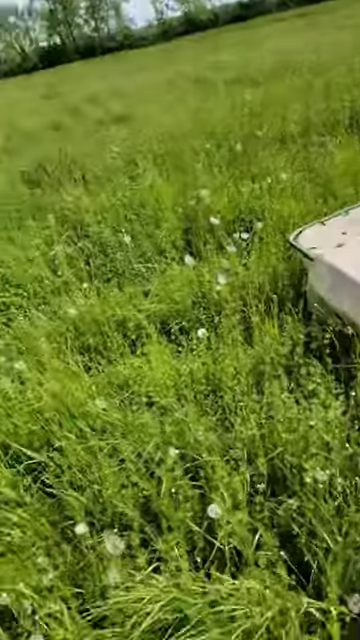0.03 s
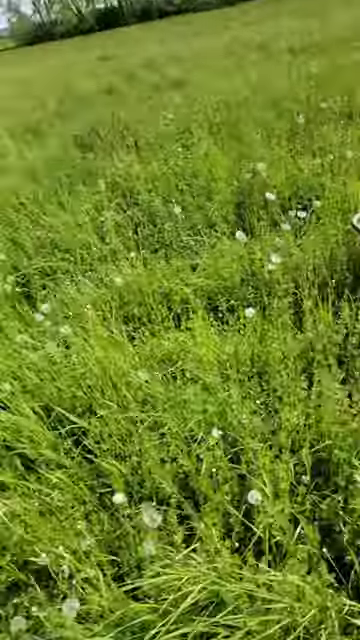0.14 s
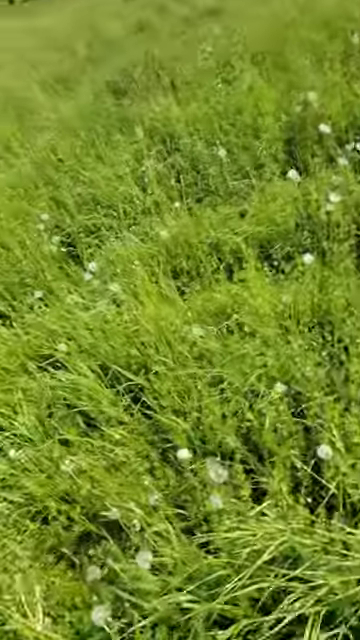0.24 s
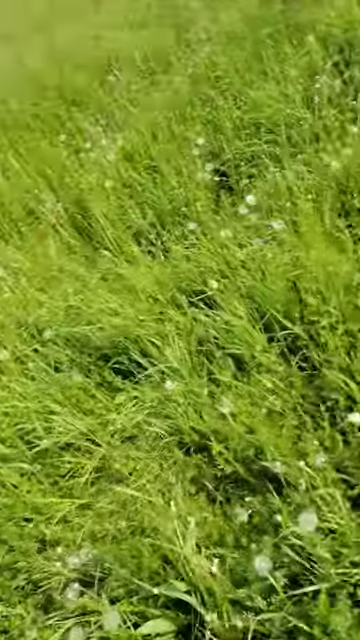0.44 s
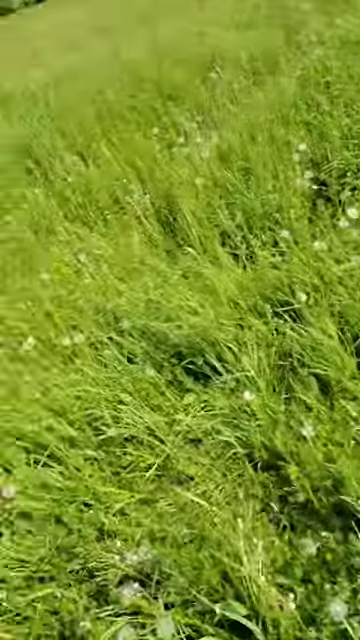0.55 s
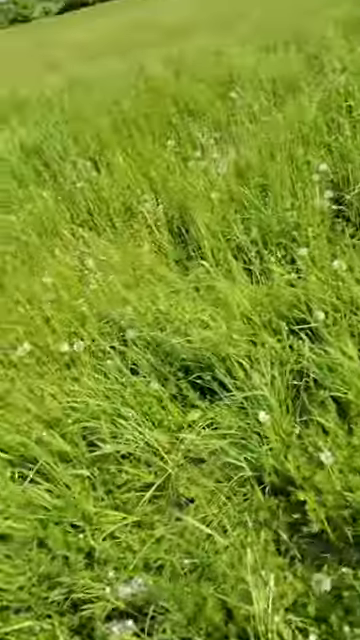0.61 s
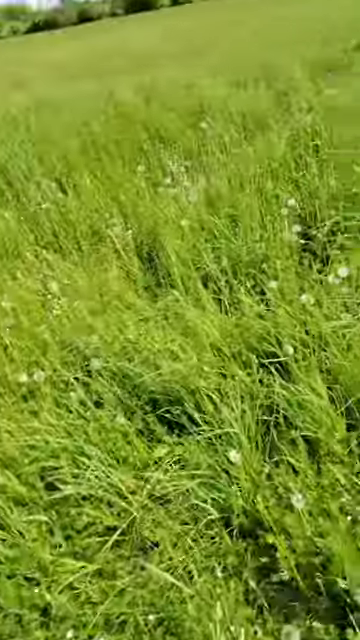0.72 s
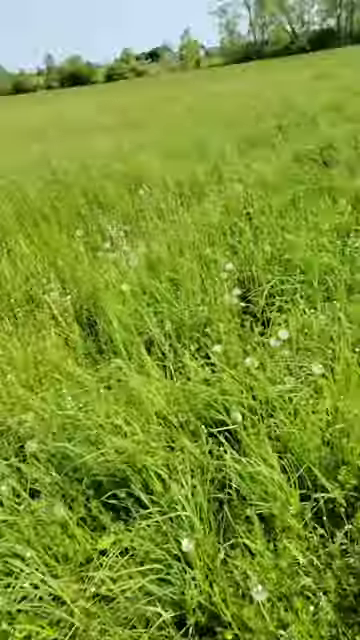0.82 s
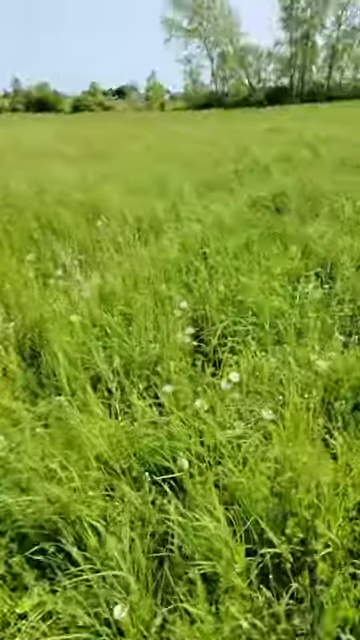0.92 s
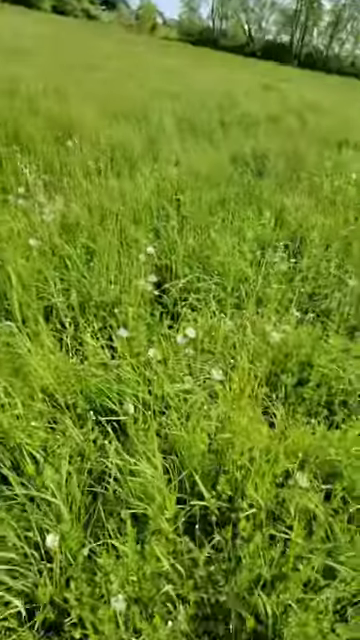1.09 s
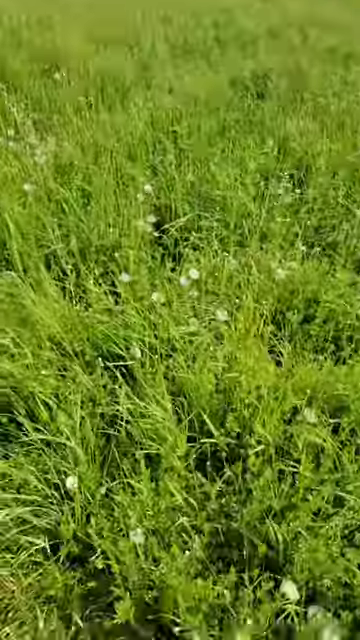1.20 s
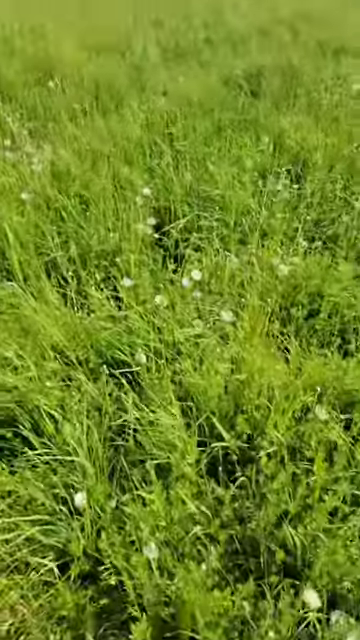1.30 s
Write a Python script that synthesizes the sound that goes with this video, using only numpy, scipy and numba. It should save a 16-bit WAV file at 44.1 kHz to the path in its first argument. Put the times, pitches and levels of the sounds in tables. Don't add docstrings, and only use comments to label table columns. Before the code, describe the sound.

A fawn bleats once, close and loud, in an open field. A tiny creak at 0.12 s jumps quickly upward into a bright, nasal cry, loudest near 0.27 s, rough and buzzing until about 0.53 s, then softer, cleaner and dropping in pitch to stop by 0.68 s. Throughout, a more distant diesel idles with low rumble, light knocking, faint whine and hiss, left alone until the end.

```python
import sys
import numpy as np
from scipy import signal
from scipy.fft import rfft, irfft
from scipy.io import wavfile
from scipy.ndimage import uniform_filter1d, minimum_filter1d
from numba import njit

SR = 44100
rng = np.random.default_rng(int(sys.argv[2]) if len(sys.argv) > 2 else 0)


def int16_out(signal):
    q = np.round(np.clip(np.atleast_2d(signal).T, -1, 1) * 32767)
    wavfile.write(sys.argv[1], SR, q.astype(np.int16))


def to_linear_factor(level_db):
    exponent = np.asarray(level_db, float) / 20
    return 10 ** exponent


N = 59535


def table(rows, t, first=1):
    rows = np.array(rows, float)
    return [np.interp(t, rows[:, 0], c) for c in rows.T[first:]]


def level(x, db):
    return x * to_linear_factor(db) / np.sqrt(np.mean(x ** 2))


@njit
def svf(x, hz, width):
    y, b, l = np.empty(len(x)), 0., 0.
    for i in range(len(x)):
        g, k = np.tan(np.pi * hz[i] / SR), width / hz[i]
        v = (b + g * (x[i] - l)) / (1 + g * (g + k))
        b, l, y[i] = 2 * v - b, l + 2 * g * v, k * v
    return y


def walk(rate):
    k = int(SR / rate)
    steps = np.repeat(rng.standard_normal(N // k + 1), k)
    w = uniform_filter1d(uniform_filter1d(steps, k), k)[:N]
    return w / w.std()


def coloured(shape):
    f, out = np.fft.rfftfreq(N, 1 / SR) + 1, 0
    gain = to_linear_factor(table([(np.log(a), b) for a, b in shape], np.log(f))[0])
    for centre in np.arange(4.5, 15, .5):
        band = np.clip(1 - 2 * abs(np.log2(f) - centre), 0, 1) ** .5
        noise = irfft(rfft(rng.standard_normal(N)) * gain * band, N)
        flicker_db = 0.5 * walk(12.09)
        out = out + to_linear_factor(flicker_db) * noise
    return out


# multiple of the firing rate, level/dB
EXHAUST_PARTIALS = [(.75, -84), (1, -52.5), (1.25, -62), (1.5, -71.5), (1.75, -65), (2, -50), (2.25, -76),
                    (3, -57), (4, -65), (5, -64.5)]


def exhaust(turns):
    out = 0
    for k, db in EXHAUST_PARTIALS:
        strength = 1.44 * to_linear_factor(db + 2.1 * walk(12))
        phase = 2 * np.pi * (k * turns + rng.random()) + 0.23 * walk(10.9)
        out = out + strength * np.sin(phase)
    return out


# f/Hz, level/dB
WHINE_TONES = [(474.6, -47), (546, -64.5), (728, -77.5), (800, -61.5), (898, -56.5), (955, -80), (990, -77),
               (1286, -58.5)]


def whines(t):
    out = 0
    for f, db in WHINE_TONES:
        strength = 1.25 * to_linear_factor(db + 1.06 * walk(20.3))
        phase = 2 * np.pi * (f * t + rng.random()) + 0.37 * walk(14.8)
        out = out + strength * np.sin(phase)
    return out


# place in cycle 0-1, f/Hz, 60 dB decay time/s, level/dB
KNOCK_MODES = [(0, 1300, 0.035, -37), (0.3, 810, 0.044, -45.5), (0.6, 1900, 0.013, -39),
               (0.3, 900, 0.013, -53), (0, 850, .03, -49)]


def knocks(turns, firing_hz):
    out = 0
    for place, f, ring_s, db in KNOCK_MODES:
        beat = turns / 4 - place
        age = beat % 1 * 4 / firing_hz
        luck = rng.standard_normal((40, 2))[np.floor(beat).astype(int) + 2].T
        strength = to_linear_factor(db + 2.3 * luck[0] - 60 * age / ring_s)
        rise = np.clip(age / 0.0032, 0, 1)
        out = out + strength * np.sin(2 * np.pi * f * (1 + 0.04 * luck[1]) * age) * rise
    return out


def injector(turns):
    burst = rng.standard_normal(N) * np.exp(-(turns % 1) / 0.26)
    return level(svf(burst, np.full(N, 5240.), 110.), -70)


# f/Hz, level/dB per Hz
AIR_SPECTRUM = [(18, -36), (30, -1), (98, -9), (312, -15), (473, -8.5), (527, -12), (891, -8),
                (1110, -11.5), (5600, -27.5), (7280, -65), (12300, -120)]
# f/Hz, level/dB per Hz
HISS_SPECTRUM = [(5000, -35), (5800, 0), (7600, 7), (8700, -22), (11000, -0.5), (15700, -1.5), (20000, -9)]
# t/s, level/dB
PHONE_TURN = [
    (0, -5.5),
    (.15, -0.5),
    (.6, -1),
    (1.35, -1),
]


def clatter(t, turns):
    puff_db = 4 * np.cos(2 * np.pi * (turns - .1)) / 2
    puff = to_linear_factor(puff_db + table(PHONE_TURN, t)[0])
    air = coloured(list(AIR_SPECTRUM) + [(5900, AIR_SPECTRUM[-1][1] - 25)])
    return level(air * puff, -47) + level(coloured(HISS_SPECTRUM) * puff, -65.5)


def engine(t):
    firing_hz, first_tick_s = 45.56, .0439
    turns = firing_hz * (t - first_tick_s)
    tones = exhaust(turns) + whines(t)
    return tones + knocks(turns, firing_hz) + injector(turns) + clatter(t, turns)


# t/s, f/Hz
FOLD_PITCH = [
    (.155, 406.7),
    (.181, 422.6),
    (.216, 533),
    (.268, 632.6),
    (.4, 623),
    (.51, 618.2),
    (.622, 577.4),
    (.654, 507),
    (.685, 435),
]


def fold_pitch(t):
    hz = table([(.118, 129.35)] + list(FOLD_PITCH), t)[0]
    hz = uniform_filter1d(hz, size=661) * (1 + .001 * walk(130))
    return hz, np.cumsum(hz) / SR


# t/s, strong-weak alternation/dB, scatter/dB, timing scatter/us, breath level/dB
FOLD_ROUGHNESS = [(.12, 0, 2, 30, -20), (.2, 0, .5, 5, -26), (.25, .5, .8, 7, -24),
                  (.262, 2.5, 1.5, 14, -20), (.272, 2.5, .4, 3, -34), (.31, 2.5, .5, 4, -32),
                  (.325, 1, .9, 9, -23), (.525, 1.2, .9, 9, -24), (.54, 0, .3, 4, -31),
                  (.62, 0, .3, 5, -29), (.68, 0, .5, 8, -24)]
# t/s, dip level/dB
SKIPPED_BEATS = [(0.3123, -1.5), (0.3172, -2.0), (0.3267, -8.4), (0.3363, -8.2), (0.3441, -2.0),
                 (0.3522, -7.5), (0.3619, -9.4), (0.3716, -5.8), (0.3814, -4.8), (0.3922, -5.1),
                 (0.4006, -4.8), (0.41, -1.6), (0.4166, -2.6), (0.4241, -4.9), (0.4319, -2.0),
                 (0.4393, -3.9), (0.4488, -7.0), (0.4584, -7.0), (0.4678, -4.5), (0.4748, -6.7),
                 (0.4837, -2.0), (0.4877, -5.8), (0.497, -6.5), (0.5038, -7.5), (0.5101, -7.8),
                 (0.5164, -4.0), (0.5262, -4.3)]


def fold_source(t, hz, turns):
    cycle = np.round(turns).astype(int)
    alternate_db, scatter_db, jitter_us, breath_db = table(FOLD_ROUGHNESS, t)
    skip_lead_s, skip_depth = .001, 2
    skip_db = np.zeros(cycle[-1] + 1)
    for s, db in SKIPPED_BEATS:
        skip_db[cycle[int((s - skip_lead_s) * SR)]] = skip_depth * db
    luck = rng.standard_normal((2000, 2))[cycle].T
    strong_weak = (cycle % 2 - .5) * 2
    size_db = skip_db[cycle] + alternate_db * strong_weak + scatter_db * luck[0]
    snap = turns + uniform_filter1d(luck[1], size=15) * jitter_us * hz / 10 ** 6
    pulses = 0
    for k in range(1, 80):
        pulses = pulses + np.cos(2 * np.pi * k * snap) * (k * hz < .4 * SR)
    breath = to_linear_factor(breath_db + 14) * rng.standard_normal(N) * (1 + np.cos(2 * np.pi * turns))
    return pulses * to_linear_factor(uniform_filter1d(size_db, size=15)), breath


# t/s, level/dB, mouth f/Hz, throat f/Hz, throat level/dB, brightness/dB
CREAK_SHAPE = [
    (.112, -80, 2080, 3270, -10, 17),
    (.142, -50, 2130, 3300, -23, 19),
    (.162, -29.5, 1560, 3340, -19, -8),
    (.176, -38.5, 1280, 3100, -22, -4),
]
CRY_SHAPE = [
    (0.188, -22.5, 1280, 3150, -14, -10.5),
    (0.204, -14, 1510, 3050, -17, 6.5),
    (0.238, -12, 1890, 3020, -1, 9),
    (0.268, -6.5, 1743, 2726, 0.5, 1),
    (0.431, -13, 1710, 2994, 4, -8),
    (0.549, -20, 1762, 2940, 3, -27.5),
    (.612, -25.5, 1700, 2800, -2.5, -22.5),
    (0.65, -19.5, 1530, 2784, -1, -14),
    (.674, -29, 1550, 2550, 0, -18),
]


def articulation(t):
    release_s = 0.0099
    start, end = CREAK_SHAPE[0], CRY_SHAPE[-1]
    silence = (end[0] + release_s, end[1] - 30) + tuple(end[2:])
    shape = table(list(CREAK_SHAPE) + list(CRY_SHAPE) + [silence], t)
    sounding = (t > start[0]) & (t < end[0] + 1.5 * release_s)
    return [to_linear_factor(shape[0]) * sounding] + shape[1:]


def formant(x, hz, width):
    return svf(svf(x, hz, 0.92 * width), hz, 0.92 * width)


# t/s, f/Hz
NASAL_GLIDE = [
    (.115, 5150),
    (.155, 3620),
    (.185, 3770),
    (.22, 4560),
    (.258, 4960),
    (.272, 4480),
    (.6, 3940),
    (.66, 4800),
]


def tract(t, source, mouth_hz, throat_hz, throat_db, bright_db):
    mouth = formant(source, mouth_hz, 574)
    throat = formant(source * to_linear_factor(throat_db), throat_hz, 758)
    nasal = formant(source * to_linear_factor(bright_db), table(NASAL_GLIDE, t)[0], 580)
    return mouth + throat + to_linear_factor(-5) * nasal


def head_modes(modes, source, airy, opening, bright_db):
    out = 0
    for f, width, db, share in modes:
        patchy_db = 3 * walk(30.3)
        drive = (airy if f > 5000 else source) * opening
        drive = drive * to_linear_factor(db + share * bright_db + patchy_db)
        out = out + formant(drive, f * (1 + 0.033 * walk(23.7)), width)
    return out


FOLD_SWING_DB = [
    -18,
    -5,
]


def fold_swing(turns):
    out = 0
    for k, db in enumerate(FOLD_SWING_DB):
        out = out + to_linear_factor(db) * np.cos(2 * np.pi * (k + 1) * turns)
    return out


# f/Hz, width/Hz, level/dB, share of brightness
NOSE_MODES = [(2450, 400, -8, .2), (5600, 500, -9, 1.2), (6300, 400, -20, .6), (7500, 600, -15, .5),
              (8700, 900, -22, .5)]
# f/Hz, width/Hz, level/dB, share of brightness
TOP_MODES = [(9720, 610, -40.5, 2.2), (12300, 2600, -40, 0.97), (15000, 2500, -44.5, 1.1)]
# f/Hz, width/Hz
NOSE_POCKETS = [(3720, 183), (6550, 120)]


def fawn(t):
    hz, turns = fold_pitch(t)
    pulses, breath = fold_source(t, hz, turns)
    effort, mouth_hz, throat_hz, throat_db, bright_db = articulation(t)
    source = (pulses + breath) * effort
    airy = source + breath * effort * to_linear_factor(9)
    opening = (hz / hz.max()) ** 2
    voice = tract(t, source, mouth_hz, throat_hz, throat_db, bright_db)
    voice = voice + head_modes(NOSE_MODES, source, airy, opening, bright_db)
    for f, width in NOSE_POCKETS:
        voice = voice - svf(voice, np.full(N, float(f)), float(width))
    head_cut = signal.butter(6, 9200, fs=SR, output="sos")
    voice = signal.sosfilt(head_cut, voice) + head_modes(TOP_MODES, source, airy, opening, bright_db)
    return voice + effort * opening ** 2 * fold_swing(turns)


def scene():
    t = np.arange(N) / SR
    return (engine(t) + fawn(t))[None]


@njit
def recover(gain, rate):
    y, g = np.empty(len(gain)), 1.
    for i in range(len(gain)):
        g = min(gain[i], g + (1 - g) * rate)
        y[i] = g
    return y


def roll_off(x):
    return signal.sosfilt(signal.butter(12, 15720, fs=SR, output="sos"), x)


def record(dry):
    limit, release_s = .7, .04
    need = minimum_filter1d(np.minimum(1, limit / (abs(dry[0]) + 1e-9)), 65)
    gain = uniform_filter1d(recover(need, 1 / (release_s * SR)), 33)
    return roll_off(dry * gain)


dry = scene()
out = record(dry)
int16_out(out)
```